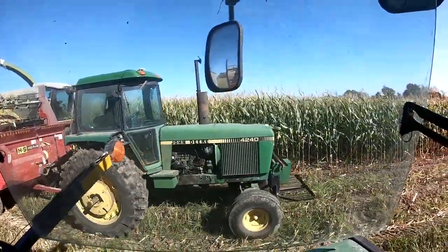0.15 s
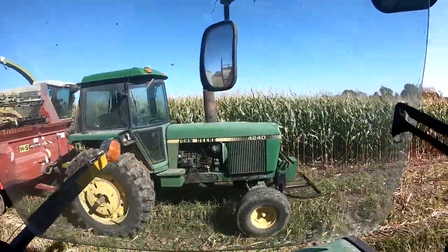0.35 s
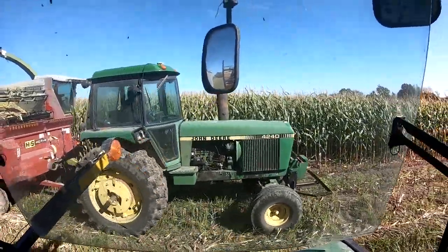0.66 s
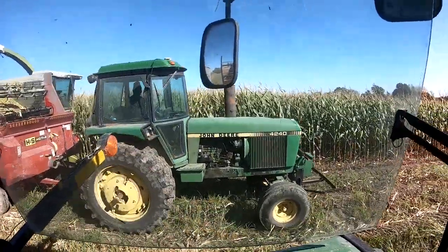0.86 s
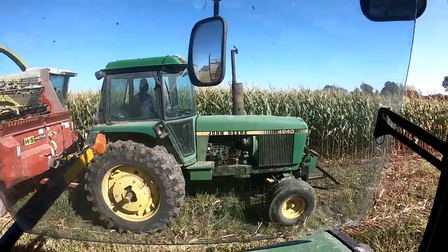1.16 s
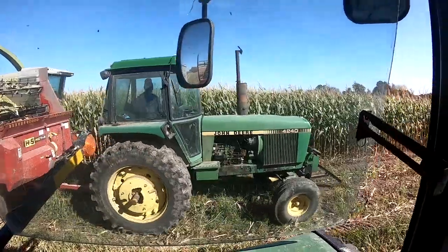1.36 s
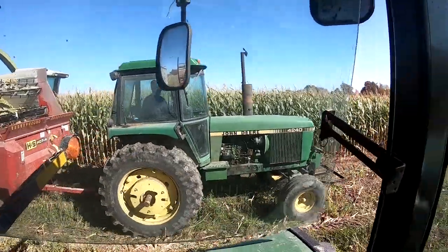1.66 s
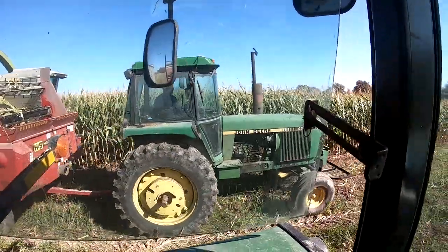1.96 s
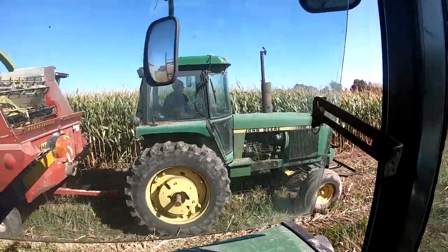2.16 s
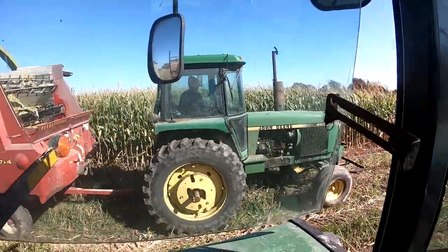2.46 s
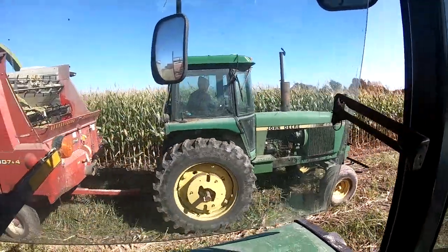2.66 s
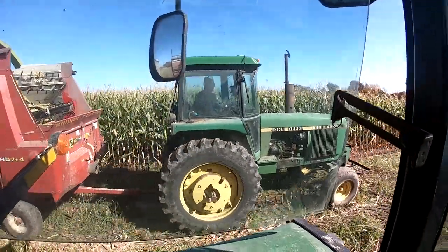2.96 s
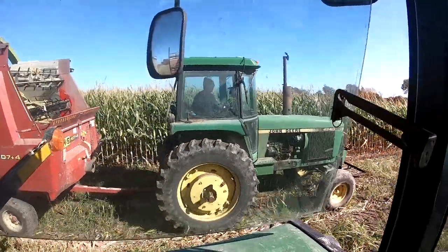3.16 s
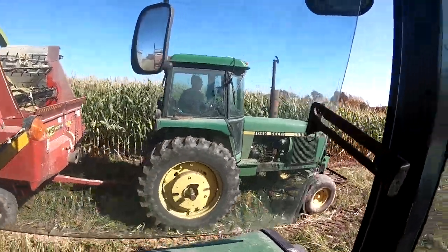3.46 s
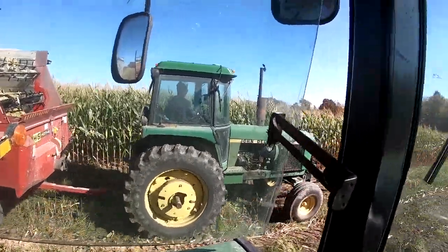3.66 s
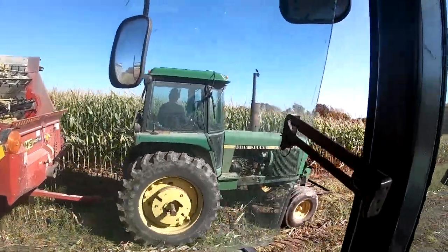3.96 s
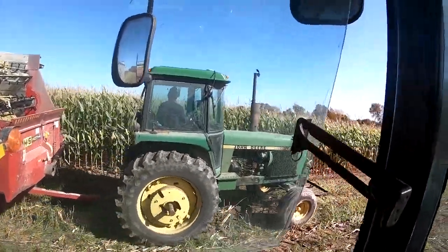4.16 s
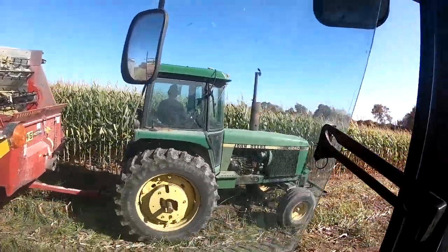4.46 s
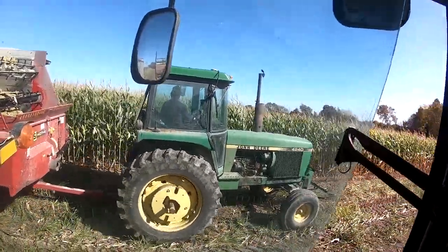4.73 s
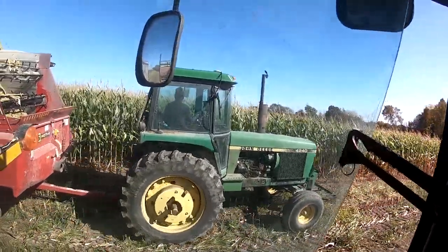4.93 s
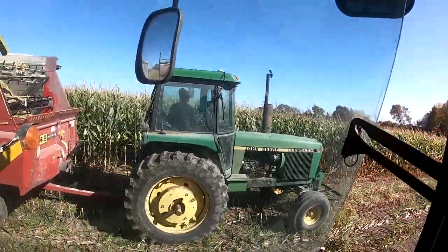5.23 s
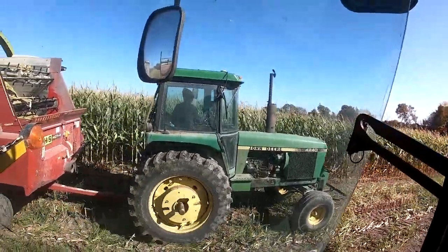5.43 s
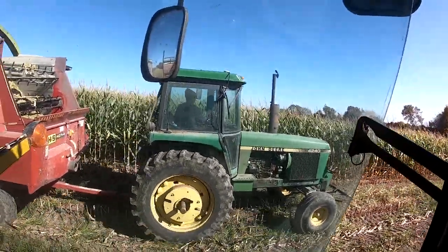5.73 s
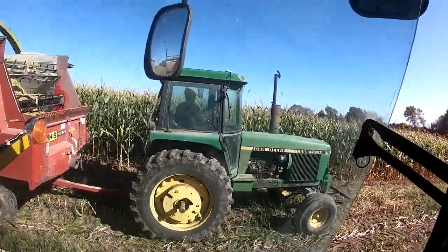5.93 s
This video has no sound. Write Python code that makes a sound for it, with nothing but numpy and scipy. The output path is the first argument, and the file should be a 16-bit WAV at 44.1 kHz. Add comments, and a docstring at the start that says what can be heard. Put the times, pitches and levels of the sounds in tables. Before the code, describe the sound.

Steady in-cab diesel drone with harvester hum and chopping roar; early rattles, a brief engine sag, then rising revs, growling surges and faint gear whine.

```python
"""Inside a cab that rolls beside a tractor and its forage harvester in a maize field.
From the start the cab's six-cylinder diesel throbs at low revs as summed sines, and noise rings the air modes.
Tractor and harvester hum as harmonics and roar as coloured noise; jolted fittings rattle as decaying bursts.
Near 2 s the diesel sags and an air mode begins to growl in surges, a sine of wandering pitch.
The diesel then picks up, above its first speed in the end, and its timing gears whine, a sine tied to its speed."""
import sys
import numpy as np
from scipy import signal
from scipy.fft import rfft, irfft, next_fast_len
from scipy.io import wavfile
from scipy.ndimage import uniform_filter1d

SR = 44100
rng = np.random.default_rng(int(sys.argv[2]) if len(sys.argv) > 2 else 0)


def wav_out(sig):
    """Save sig, one row per channel (or a flat mono array), as 16-bit PCM at SR to the path in sys.argv[1]."""
    wavfile.write(sys.argv[1], SR, np.round(np.clip(np.atleast_2d(sig).T, -1, 1) * 32767).astype(np.int16))


N = 268569
T = np.arange(N) / SR
CYLINDERS = 6  # of the cab's own diesel

# likeness of hum and roar at the two ears: f/Hz, side minus mid level/dB
EAR_WIDTH = [(60, -9.5), (190, -22), (340, -16), (600, -9), (1060, -3), (3300, -7), (6000, -2), (9000, 2)]
# balance of hum and roar between the ears: f/Hz, left minus right level/dB
EAR_LEAN = [(250, -1), (600, -2), (1060, -3.5), (3300, -2), (6000, 0.2)]


def undb(db):
    """Decibels to amplitude ratio: 20 dB is a factor of ten."""
    return 10 ** (np.asarray(db) / 20)


def unit(x):
    """Normalise to an rms value of 1."""
    return x / np.sqrt(np.mean(x ** 2))


def curves(table):
    """Linear interpolation in time: one value per sample for each column after t."""
    s, *columns = np.transpose(table)
    return [np.interp(T, s, c) for c in columns]


def at(table, hz):
    """Interpolation of a spectrum on a logarithmic frequency axis."""
    f, value = np.transpose(table)
    return np.interp(np.log(hz), np.log(f), value)


def lift(table, hz):
    """Resonance curves, each falling to half its dB at half its width from the centre, summed in dB."""
    return sum(db / (1 + (2 * (hz - f) / width) ** 2) for f, width, db in table)


def resonate(x, hz, width_hz):
    """Two-pole resonance with gain 1 at its centre."""
    b, a = signal.iirpeak(min(hz, SR * .45), hz / width_hz, fs=SR)
    return signal.lfilter(b, a, x)


def walk(rate):
    """Smoothed random process of rms 1, drawn at rate points a second."""
    knots = rng.standard_normal(1024)
    wander = np.interp(T * rate, np.arange(len(knots)), knots)
    return unit(uniform_filter1d(wander, max(int(SR / rate / 2), 1)))


def turns(hz):
    """Phase in radians as the running integral of frequency."""
    return 2 * np.pi * np.cumsum(hz) / SR


def bump(s, length):
    """Gaussian in time about s, falling to 1/e at length seconds to either side."""
    return np.exp(-((T - s) / length) ** 2)


def spread(mid, side, side_db, lean_db):
    """Mid-side stereo: the sum and difference of a shared and a differing part, then a balance."""
    side = side * undb(side_db)
    left = (mid + side) * undb(lean_db / 2)
    right = (mid - side) * undb(-lean_db / 2)
    return np.array([left, right])


def own_diesel(cycle, firing_hz, boom_db, throb=0.15, waver_db=0.56, order_waver_db=3.0, jitter=0.12,
               firing_db=-1.07):
    """Periodic firing makes a boom; unequal cylinders modulate it and add orders that cab resonances lift."""
    # brief dips of the boom: t/s, depth/dB, half length to 1/e/s
    dips = [(.74, 3, 0.024), (1.01, 10, 0.015), (1.435, 2.5, 0.091), (1.994, 8.5, 0.069),
            (2.214, 11, 0.018), (2.62, 2.5, 0.023), (3.55, 3.5, 0.02), (3.743, 5, .025), (5.843, 6, 0.014)]
    # lines of the cab's own diesel: multiple of the four-stroke cycle rate, level/dB before the lift
    own_lines = [(4, -55), (8, -49), (10, -56.5), (12, -41.5), (15, -48.5), (16, -42.5), (17, -50),
                 (18, -48.5), (19, -48.5), (20, -46.5), (21, -50), (22, -45.5), (24, -46), (32, -47)]
    # cab resonances that these lines pass through: f/Hz, width/Hz, lift/dB
    booms = [(42.4, 16, 16.5), (74.7, 10, 8), (103.8, 6, 7), (140.7, 15, 2)]
    dips_db = sum(depth * bump(s, length) for s, depth, length in dips)
    throbbing = 1 + throb * (firing_hz / firing_hz.max()) ** 2 * np.cos(cycle)
    gain = undb(boom_db + firing_db + waver_db * walk(17) - dips_db) * throbbing
    firing = CYLINDERS * cycle
    lines = 0
    for order, db in own_lines:
        order = round(order)
        angle = order * cycle + 2 * np.pi * rng.random() + jitter * walk(10.0)
        lift_db = lift(booms, order * firing_hz / CYLINDERS)
        lines = lines + unit(np.sin(angle)) * undb(db + lift_db + order_waver_db * walk(7))
    boom = gain * unit(np.sin(firing))
    quadrature = gain * unit(np.cos(firing))
    return spread(boom + lines, quadrature, side_db=-18.5, lean_db=0.5)


def cab_drone(drone_db=-6.0, steadiness=0.92):
    """Forced resonance: uneven shaking of the panels, as noise, rings the air modes of the cab."""
    # air modes of the cab: f/Hz, width/Hz before narrowing by the double pass, relative level/dB
    air_modes = [(133.4, 11, -3.5), (140.6, 17.4, -4.5), (243, 32.6, -8)]
    # course of the drone: t/s, level/dB before the common trim drone_db
    drone_levels = [(0, -26), (1.0, -26), (1.9, -28), (3.0, -30), (3.55, -24), (4.0, -27.5), (6.09, -22.5)]
    drone = 0
    for hz, width, db in air_modes:
        ring = resonate(rng.standard_normal(N), hz, 1.23 * width)
        ring = resonate(ring, hz, 1.23 * width)
        # dividing by most of its own envelope steadies the ring
        swell = np.sqrt(np.abs(uniform_filter1d(ring ** 2, size=4000)) + 1e-12)
        drone = drone + undb(db) * unit(ring / swell ** steadiness)
    return drone * undb(curves(drone_levels)[0] + drone_db)


def diesel(cycle, waver_db=1.5, jitter=0.1):
    """Engine orders at a governed, nearly steady speed: a firing line and weaker ones, each slowly growing or fading."""
    # lines of the other tractor: multiple of its four-stroke cycle rate, mid-time level/dB, slope/(dB/s)
    engine_lines = [(6, -33.5, 1.06), (13, -49, 2), (16, -48, -1.7), (18, -50.5, 1.7)]
    out = 0
    for order, db, db_per_s in engine_lines:
        gain = undb(db + db_per_s * (T - T.mean()) + waver_db * walk(9))
        out = out + gain * unit(np.sin(round(order) * cycle + jitter * walk(11)))
    return out


def rotor(blade, blade_hz, waver_db=1.2, scatter=0.32, free_db_per_hz=-0.3):
    """Blade-passing harmonics, brighter when crop drags the blades; shifting echoes interfere, so each flutters."""
    # the hum, shifting as the machines pass each other: harmonic, level at the start/dB, slope/(dB/s)
    blade_lines = [(1, -34, -0.71), (2, -46.5, 1.41), (3, -46, -0.05), (4, -41.5, -0.55), (6, -52, 0.1)]
    # swells and fades of one harmonic: t/s, harmonic, rise/dB, half length to 1/e/s
    swells = [(.3, 4, 6, .12), (.68, 4, 3, .12), (.55, 3, 6, .25), (1.6, 3, 6, .14), (1.9, 4, 7, .22),
              (2.03, 1, 9.5, .21), (2.7, 2, 2, .5), (2.2, 3, 5, .35), (2.28, 4, -5, .06), (3.3, 2, 4, .15),
              (3.3, 1, -4, .2), (3.5, 4, -5, .15), (3.85, 1, 5, .14), (3.95, 6, 9, .1), (4.17, 4, 6, .13),
              (4.3, 6, 10, .08), (4.42, 2, -9, .13), (4.5, 3, 4, .12), (4.9, 4, -3, .3), (5.08, 2, 6, .2),
              (5.6, 2, 5.5, .3)]
    out = 0
    for order, level_db, db_per_s in blade_lines:
        order = round(order)
        swell_db = sum(rise * bump(s, length) for s, harmonic, rise, length in swells
                       if round(harmonic) == order)
        load_db = free_db_per_hz * (blade_hz - np.median(blade_hz)) * (order > 1)
        # direct sound 1 plus a random complex sum of echoes
        echoes = 1 + scatter * min(order / 2, 1) * (walk(13) + 1j * walk(13))
        angle = order * blade + np.angle(echoes)
        gain_db = level_db + db_per_s * T + swell_db + load_db + waver_db * walk(14)
        gain = undb(gain_db) * unit(np.abs(echoes))
        mid = gain * unit(np.sin(angle))
        side = gain * unit(np.sin(angle + 2 * walk(8.1)))
        hz = order * blade_hz[0]
        out = out + spread(mid, side, at(EAR_WIDTH, hz), at(EAR_LEAN, hz))
    return out


def glass(hz, echo=0.077, count=8):
    """Comb filtering: a few echoes within 15 ms at the cab's windows ripple the spectrum finely."""
    delays = rng.uniform(.003, .015, count)
    return 1 + echo * sum(np.exp(-2j * np.pi * hz * delay) for delay in delays)


def roar(cycle, blade, firing_hz, roar_db=-29.0, knock=0.03, chop=0.031, grain_db=0.57, flicker_db=0.8,
         body_hz=900, clatter_hz=2400, hiss_hz=6000, low_share=0.4, hiss_share=0.42):
    """Broadband noise of fans and chopped crop, amplitude-modulated a little by firings and blades."""
    # colour of the roar: f/Hz, relative spectral level/dB
    roar_colour = [(22, 2.5), (33, 14.5), (48, 13), (62, 3.5), (170, -2), (290, 0.5), (450, -8.5),
                   (900, -7.5), (1700, -10.5), (2600, -12.5), (4500, -22.5), (7800, -29.5), (9600, -33.5),
                   (15000, -42)]
    # standing waves of the cab that lift or swallow the roar: f/Hz, width/Hz, lift/dB
    panels = [(180, 22, 6), (273.3, 18, -15), (606, 15, -5.5), (624, 320, 5), (1060, 200, 1),
              (1305, 200, 3), (2380, 120, 2.5), (3360, 340, 1.5)]
    # how hard the machines work: t/s, body relative level/dB, clatter relative level/dB
    work = [(0, 0.3, 0), (1.3, 0.5, -0.3), (2.2, -0.5, 3), (2.75, -1.5, 0.8), (3.25, -2, 1.7),
            (3.7, -2.5, -1.5), (4.1, 2.5, 1), (4.7, 2.5, 0.9), (5.3, 5, 2.5), (6.09, 4.5, 2)]
    body, clatter = curves(work)
    hiss = hiss_share * body + (1 - hiss_share) * clatter
    # diesel knock: sharp at each firing, every second one stronger, harder at higher revs
    firing = sum(np.cos(k * cycle) for k in (3, 6, 12)) * (firing_hz / firing_hz.max()) ** 2
    pulse = (1 + knock * firing + chop * np.cos(blade)) * undb(grain_db * walk(160))
    size = next_fast_len(N)
    hz = np.maximum(np.arange(size // 2 + 1) * SR / size, 1)
    colour = undb(at(roar_colour, hz) + lift(panels, hz))
    low_cut = hz / np.hypot(hz, 20)
    mid, side = [rfft(rng.standard_normal(size)) * colour * glass(hz) * low_cut for _ in range(2)]
    field = spread(mid, side, at(EAR_WIDTH, hz), at(EAR_LEAN, hz))
    scale = undb(roar_db) / irfft(mid).std()
    out = 0
    # each octave follows the work as body, clatter or hiss and flickers on its own
    for centre in 2. ** np.arange(4, 15):
        window = np.maximum(1 - np.abs(np.log2(hz / centre)), 0)
        band = irfft(field * window, size)[:, :N]
        regions = np.log([body_hz, clatter_hz, hiss_hz])
        shares = [np.interp(np.log(centre), regions, row) for row in np.eye(3)]
        body_share = shares[0] * (low_share if centre < body_hz else 1)
        db = body_share * body + shares[1] * clatter + shares[2] * hiss
        out = out + band * undb(db + flicker_db * walk(12)) * (pulse if centre > body_hz else 1)
    return scale * out


def rattles(rise_s=0.0014, chatter_db=1.5, knock_hz=1200, knock_width_hz=2000, ring_scatter=0.79,
            strike_db=15, strike_gap_s=0.0044, count=4, rebound_s=0.019, rebound_db=-10):
    """Impact excitation: hard strikes amid tiny contacts ring a loose fitting's modes, which decay exponentially."""
    # jolts on the rough ground: t/s, bright level/dB, dull knock level/dB, T60 of both/s,
    # ring f/Hz, ring level/dB, ring T60/s; levels before the decay and the stereo spread
    jolts = [(0.154, -57, -29, 0.094, 2300, -28.5, .09), (.225, -32, -27, 0.076, 6800, -42, .08),
             (.422, -26, -29, .06, 6100, -41, .08), (0.481, -23, -23, 0.062, 5020, -33, .08),
             (.492, -37, -27.5, .06, 1884, -25.5, 0.1), (0.546, -40, -50, 0.12, 7950, -47, .12),
             (.869, -31, -34, 0.13, 7370, -38, .08), (.904, -39, -44, .11, 8060, -46, .11),
             (.955, -58, -37, 0.12, 1330, -27, .1), (1.054, -58, -40, .12, 1350, -30.5, 0.15),
             (1.097, -32, -28, 0.09, 5930, -42, .13), (1.108, -30.5, -28, 0.064, 720, -26, 0.11),
             (1.114, -28.5, -26.5, 0.062, 1176, -28, 0.07), (1.141, -48.5, -34, 0.11, 8550, -48, .1),
             (1.247, -47, -47, 0.064, 6530, -35.5, 0.056), (1.253, -36, -49, 0.06, 3290, -33.5, .08),
             (1.366, -40, -33, 0.11, 1990, -33.5, .12), (1.777, -42, -27, 0.19, 1640, -34, 0.26),
             (2.12, -57, -33, 0.29, 7800, -50, 0.54), (2.32, -44, -34, 0.45, 3880, -44.5, .35)]
    # what the fittings ring with: f/Hz, width/Hz, relative level/dB
    fittings = [(2890, 200, 27.5), (3600, 2800, 29.5), (4740, 160, 13.5), (7150, 710, 23.5),
                (8270, 440, 17.5), (10700, 1400, 10), (13500, 2600, 0)]
    out = np.zeros((2, N))
    t = T[:SR // 4]
    for s, bright_db, knock_db, t60, ring_hz, ring_db, ring_t60 in jolts:
        # tiny contacts whose level is redrawn 900 times a second
        chatter = np.repeat(rng.standard_normal(len(t)), SR // 900)[:len(t)]
        contacts = rng.standard_normal((2, len(t))) * undb(chatter_db * chatter)
        gaps = strike_gap_s * (.5 + rng.random(count))
        strikes = (np.cumsum(gaps) * SR).astype(int)
        contacts[:, strikes] += undb(strike_db) * rng.choice([-1, 1], (2, count))
        bright = unit(sum(undb(db) * resonate(contacts, hz, width) for hz, width, db in fittings))
        knock = resonate(contacts, knock_hz, knock_width_hz)
        knock = unit(resonate(knock, knock_hz, knock_width_hz))
        burst = (undb(bright_db) * bright + undb(knock_db) * knock) * np.exp(-np.log(1000) * t / t60)
        # renewed contacts keep knocking the ring out of step
        drift = ring_scatter * ring_hz / SR * np.cumsum(rng.standard_normal((2, len(t))), axis=1)
        tone = unit(np.sin(2 * np.pi * ring_hz * t + drift))
        ring = undb(ring_db) * tone * np.exp(-np.log(1000) * t / ring_t60)
        hit = spread(*burst, side_db=-1, lean_db=0.5) + spread(*ring, side_db=-5, lean_db=-7)
        # the fitting falls back once after the jolt
        for delay, db in (0, 0), (rebound_s, rebound_db):
            start = int((s + delay) * SR)
            out[:, start:start + len(t)] += undb(db) * hit * (1 - np.exp(-t / rise_s))
    return out


def growl(growl_db=-1.7, mode_hz=138.3, sag_hz=1.6, wander_hz=1.5, waver_db=1.0):
    """A low air mode of the cab resonates in surges; its frequency sits a little lower at high amplitude."""
    # surges of the growl: t/s, level/dB before the common trim growl_db, half length to 1/e/s
    surges = [(1.88, -22, .06), (2.075, -21.5, .065), (2.32, -28, .07), (2.73, -26, .07), (3.05, -28, .11),
              (3.88, -26, .07), (4.22, -24.5, .19), (4.68, -26, .16), (4.91, -22.5, .11),
              (5.38, -19.5, .15), (5.81, -21, .19)]
    gain = sum(undb(db) * bump(s, length) for s, db, length in surges)
    hz = mode_hz - sag_hz * gain / gain.max() + wander_hz * walk(8)
    return gain * unit(np.sin(turns(hz))) * undb(growl_db + waver_db * walk(16))


def gears(firing_hz, teeth_per_firing=19, whine_db=-41.5, db_per_hz=6, top_speed_hz=51, flutter=0.008):
    """Tooth-meshing tone: timing gears whine in step with the engine, heard only at its higher speeds."""
    phase = turns(firing_hz * teeth_per_firing * (1 + flutter * walk(40)))
    speed_db = db_per_hz * np.minimum(firing_hz - top_speed_hz, 0)
    whine = unit(np.sin(phase)) * undb(whine_db + speed_db + 2 * walk(27))
    return spread(whine, 0, side_db=0, lean_db=-8)


def scene(hunt=0.002, crop_drag=0.004, blades_per_cycle=10.25):
    """Coupled rotation: one engine drives boom, gears and knock; the other tractor drives the harvester's rotor."""
    # speed and pull of the cab's own diesel: t/s, firing rate f/Hz, boom level/dB before its trim
    throttle = [(0, 43.9, -15), (1.3, 44, -15), (1.75, 43.6, -15.5), (1.9, 42.4, -16), (2.05, 38, -16),
                (2.2, 35.8, -15), (2.4, 37.1, -13.5), (2.6, 38.1, -15.5), (3.1, 38.9, -15),
                (3.39, 39.6, -13.5), (3.54, 44.5, -15), (3.8, 44.8, -15.3), (3.94, 47.8, -14.5),
                (4.5, 50.1, -16), (4.8, 51.3, -17.5), (5.3, 51, -17.7), (6.09, 50.7, -17.3)]
    # the harvester's governed rotor: t/s, blade rate f/Hz
    rotor_speed = [(0, 187), (.45, 186.2), (1.0, 189.8), (1.3, 189.8), (1.55, 186.8), (1.9, 185.5),
                   (2.3, 187), (3.0, 187.6), (3.3, 186.7), (4.35, 186.1), (4.75, 187.2), (6.09, 186.6)]
    firing_hz, boom_db = curves(throttle)
    cycle = turns(firing_hz * (1 + hunt * walk(16))) / CYLINDERS
    blade_hz = curves(rotor_speed)[0]
    blade = turns(blade_hz * (1 + crop_drag * walk(21.915)))
    # the tractor's four-stroke cycle is geared to the blade passes
    tractor_cycle = blade / blades_per_cycle
    cab = own_diesel(cycle, firing_hz, boom_db) + cab_drone() + growl() + gears(firing_hz)
    machines = diesel(tractor_cycle) + rotor(blade, blade_hz) + roar(cycle, blade, firing_hz)
    return cab + machines + rattles()


def record(dry, port_hz=9900, leak_db=-18, top_hz=15200):
    """Low-pass filtering: a microphone port passes little above 10 kHz, and the recorder cuts the top."""
    port = signal.butter(14, port_hz, fs=SR, output="sos")
    top_cut = signal.ellip(8, .2, 70, top_hz, fs=SR, output="sos")
    dull = signal.sosfilt(port, dry)
    return signal.sosfilt(top_cut, dull + undb(leak_db) * dry)


dry = scene()
out = record(dry)
wav_out(out)
```